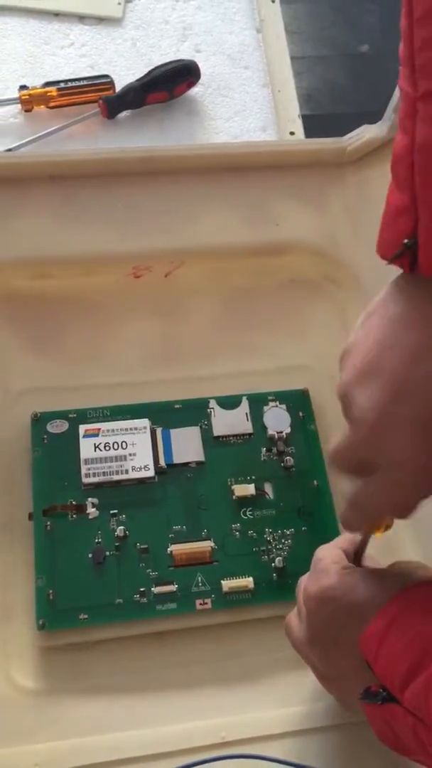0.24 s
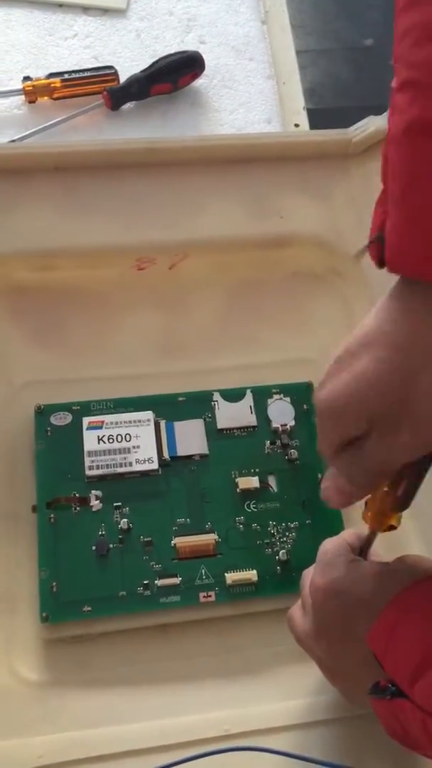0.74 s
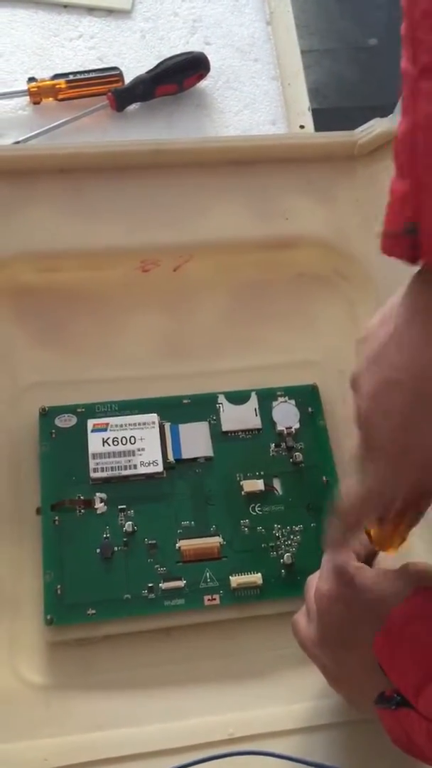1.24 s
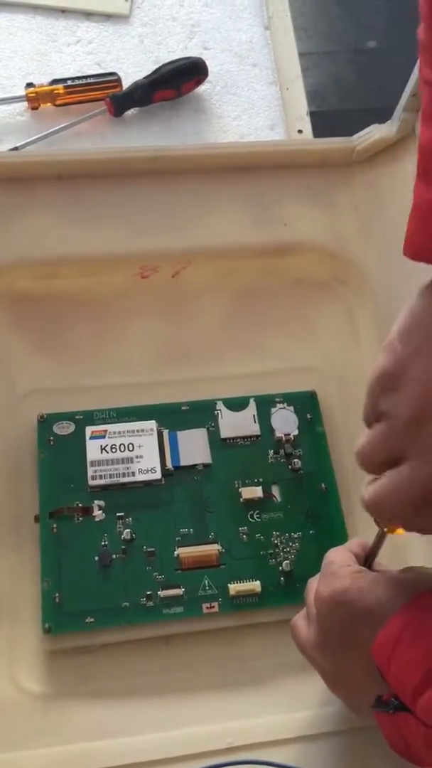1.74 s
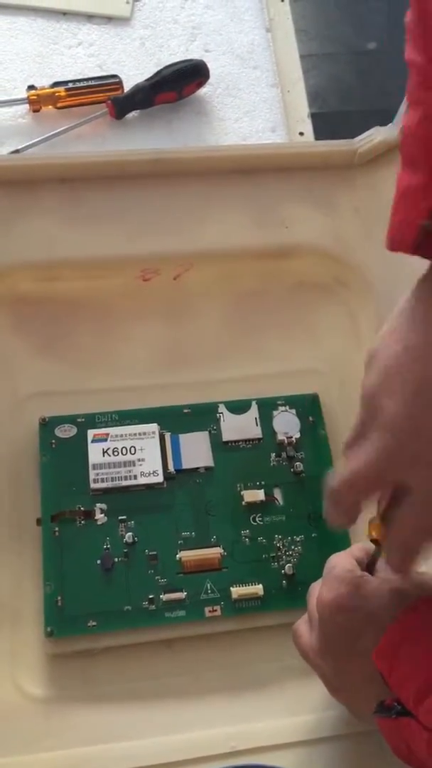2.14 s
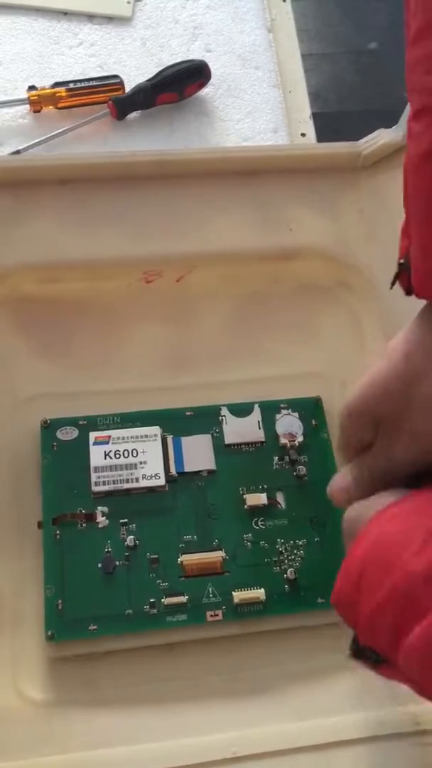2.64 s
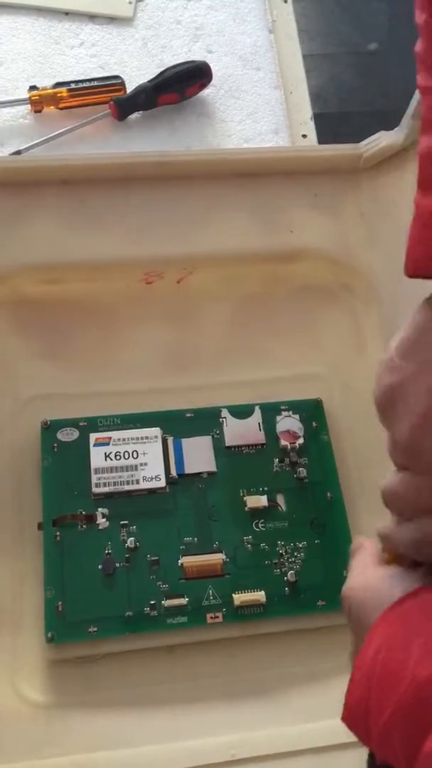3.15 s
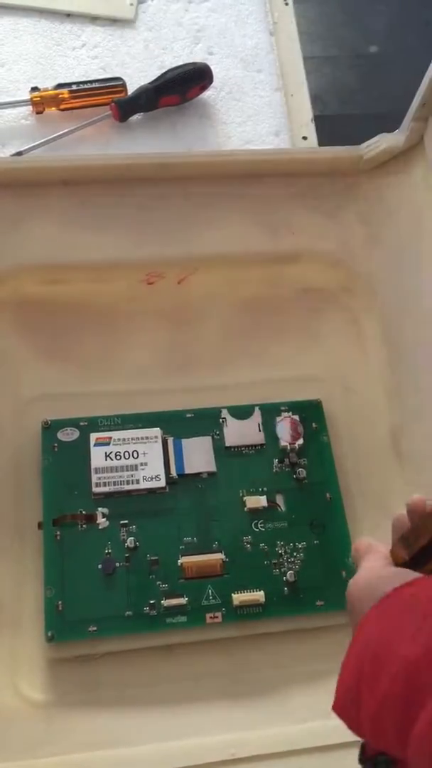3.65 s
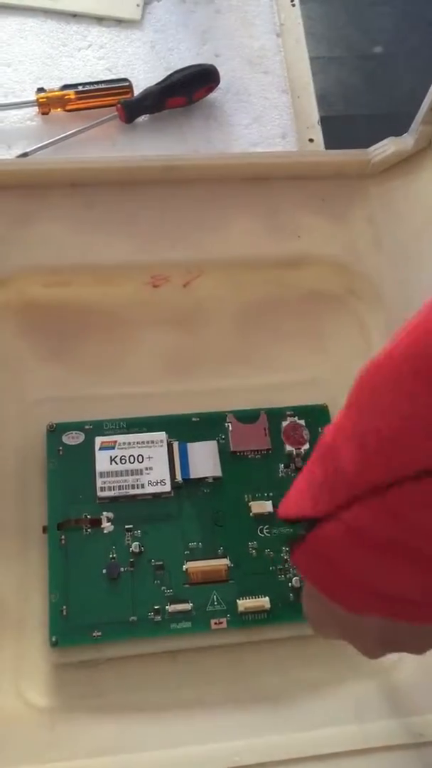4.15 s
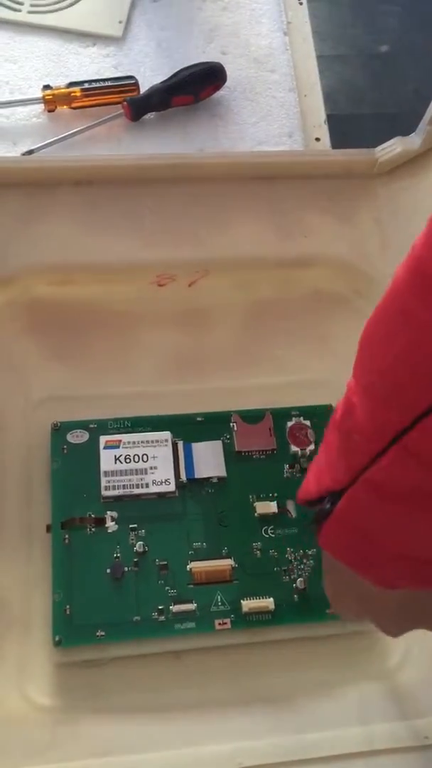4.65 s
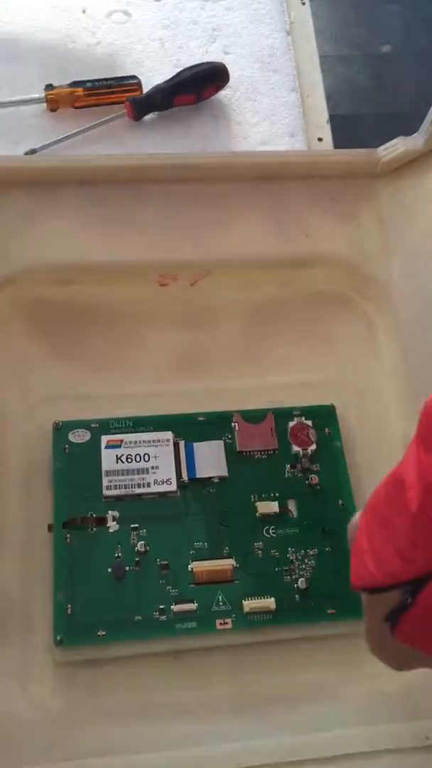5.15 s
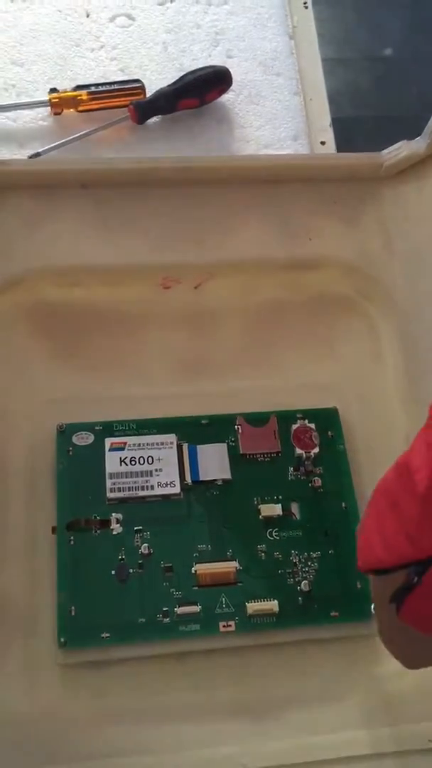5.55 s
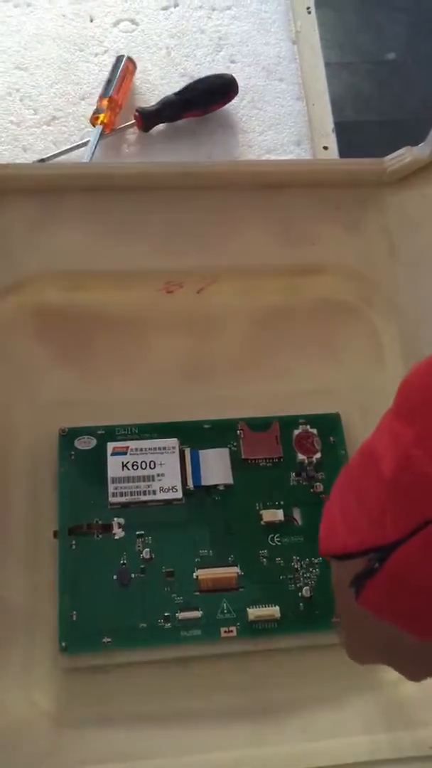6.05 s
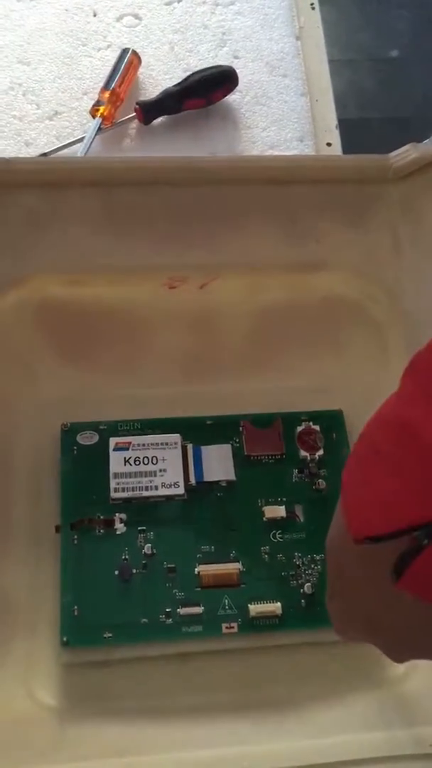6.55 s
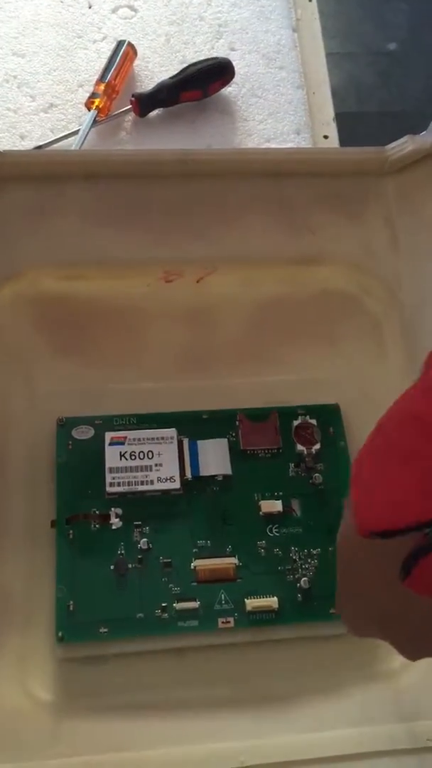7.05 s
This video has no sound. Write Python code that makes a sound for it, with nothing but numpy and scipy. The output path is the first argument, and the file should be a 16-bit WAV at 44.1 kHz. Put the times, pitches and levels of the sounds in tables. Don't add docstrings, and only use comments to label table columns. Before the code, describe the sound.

Handwork on a circuit board in a thin plastic tray: grainy skin rubbing, cloth rustle, sparse bright ticks and dull little thuds. A burst of sharp board knocks comes before the middle, then softer sweeping and light taps. Later a tool handle bounces on the table, the table is struck hard, metal shafts rattle together and another tool lifts with a clack. Small room, short echo, faint deep hum, close phone microphone.

```python
import sys
import numpy as np
from scipy import signal
from scipy.fft import rfft, irfft, next_fast_len
from scipy.io import wavfile
from scipy.ndimage import uniform_filter1d, map_coordinates

SR = 44100
rng = np.random.default_rng(int(sys.argv[2]) if len(sys.argv) > 2 else 0)


def how_loud(loudness_db):
    steps = np.asarray(loudness_db, float) / 20
    return 10 ** steps


def store_pcm(level_fs):
    pcm = np.round(np.clip(level_fs, -1, 1) * 32767).astype(np.int16)
    wavfile.write(sys.argv[1], SR, np.atleast_2d(pcm).T)


N = 321489

# frequency in Hz, level in dB per Hz.
SKIN_COLOUR = [(290, -30), (500, -3.5), (600, 0), (1250, 2.5), (2300, 3), (4410, -8), (10000, -25.5),
               (19800, -120)]
# frequency in Hz, level in dB per Hz.
SLEEVE_COLOUR = [(2350, -15), (4000, -2.5), (5190, -5), (5780, -2), (8030, -7), (9790, -6.5), (13200, -9),
                 (15500, -14.5)]
# start in seconds, fade in seconds, skin in dB, sleeve in dB.
GRIPS = [(0, 1, -55.5, -66.5), (0.071, 0.16, -49, -58), (1.053, 0.15, -41.5, -46.5),
         (1.837, 0.49, -52, -81), (2.48, 0.08, -40, -45.5), (2.536, 0.1, -35.5, -49),
         (4.179, 0.51, -51, -61), (5.276, 0.33, -52.5, -61.5), (5.455, 0.17, -39, -52),
         (5.704, 0.35, -43.5, -42), (7.087, 0.26, -47, -73)]
# peak, swell and fade in seconds, skin in dB, sleeve in dB.
TWISTS = [(0.35, 0.1, 0.17, -45.5, -55.5), (.48, 0.1, 0.064, -53.5, -92), (.83, 0.084, 0.016, -46.5, -59),
          (0.75, 0.18, 0.094, -46, -58), (0.893, 0.069, 0.045, -44, -65), (.99, 0.13, 0.14, -55, -76),
          (1.157, 0.051, 0.14, -43.5, -42.5), (1.544, 0.1, 0.061, -58, -60.5),
          (1.649, 0.11, 0.16, -60, -79), (1.993, 0.12, 0.099, -48.5, -61), (2.253, 0.019, 0.15, -45.5, -44)]
# peak, swell and fade in seconds, skin in dB, sleeve in dB.
SWEEPS = [(2.592, 0.11, 0.096, -35, -38), (2.77, 0.088, 0.72, -66, -63), (3.127, 0.045, 0.15, -49.5, -62.5),
          (3.606, 0.13, 0.11, -43, -35.5), (3.64, 0.048, 0.15, -45.5, -54),
          (3.824, 0.19, 0.17, -52.5, -56.5), (3.874, 0.13, 0.027, -71, -50),
          (4.256, 0.13, 0.41, -47, -46.5), (4.437, 0.45, 0.076, -51, -66), (4.643, 0.25, .1, -50, -51),
          (4.851, 0.074, 0.035, -49.5, -50.5), (4.926, 0.1, 0.16, -49, -47),
          (5.036, 0.11, 0.23, -52.5, -46.5), (5.44, 0.32, 0.15, -53, -56.5),
          (5.945, 0.038, 0.22, -39.5, -47), (6.099, 0.22, 0.11, -50, -46), (6.273, 0.37, 0.26, -52, -60.5),
          (6.418, 0.17, 0.27, -57.5, -57), (6.652, 0.053, 0.21, -63, -66), (7.056, 0.076, 0.35, -56.5, -62),
          (7.201, 0.19, 0.096, -40.5, -71.5), (7.29, 0.056, .1, -43, -65)]
# peak, swell and fade in seconds, tray drumming in dB, table rumble in dB.
PRESSES = [(0, .1, 0.18, -43.5, -70), (.432, 0.23, 0.076, -39.5, -60), (.642, 0.023, 0.17, -45.5, -58),
           (.791, 0.23, 0.14, -43.5, -56.5), (1.15, 0.18, 0.17, -42.5, -55),
           (1.434, 0.0088, 0.15, -39, -46.5), (1.839, 0.0058, 0.33, -45.5, -65),
           (2.048, 0.37, 0.068, -47, -59), (2.481, 0.013, 0.27, -34, -72), (2.592, 0.052, 0.33, -35, -47),
           (2.826, 0.88, 0.15, -46, -60), (3.165, 0.137, 0.25, -52.5, -70), (3.51, 0.09, 0.059, -48, -63),
           (3.684, 0.081, 0.17, -43.5, -48), (4.179, 0.0032, 0.56, -57, -57.5),
           (4.812, 0.014, 0.18, -51, -46.5), (4.68, 0.11, 0.14, -74, -51), (4.926, 0.089, 0.19, -51, -63),
           (5.06, 0.076, 0.17, -67, -60), (5.457, 0.0059, 0.3, -61, -38), (5.704, 0.0031, 0.25, -67, -33),
           (6.009, 0.078, 0.18, -31, -32), (6.33, 0.28, 0.22, -73, -53), (7.087, 0.068, 0.7, -39, -55.5)]
# skin, sleeve, tray and table, all in dB.
REST_DB = [-81, -75.5, -72, -71]

# start in seconds, peak in dB, dull part in dB beside the peak.
TICKS = [(.0741, -54, 15), (.3446, -35, -5.5), (.6035, -49, -22), (1.0535, -51, 11), (1.0695, -32.5, -12),
         (1.147, -59, -11), (1.4356, -30.5, -22), (1.4673, -58.5, 16.5), (1.836, -36, -32),
         (1.8652, -39.5, -25), (1.9054, -50, 5), (2.0096, -41.5, 9.5), (2.1375, -41, -11), (2.2467, -45, 5),
         (2.3901, -35, -5.5), (2.4798, -36, -13), (2.5107, -43.5, -13.5), (2.537, -49, 6),
         (2.6705, -35.5, 15.5), (3.8484, -30.5, -6), (4.1208, -40, 0.5), (4.1764, -40.5, 0),
         (4.5215, -33, -8.5)]
# start in seconds, peak in dB, dull part in dB beside the peak.
JOSTLES = [(5.4586, -46.5, 13.5), (5.7034, -21.5, -9.5), (5.7234, -30.5, -8), (5.7565, -32, -4),
           (5.7933, -25.5, -15), (5.8064, -26, -14), (5.8726, -33.5, -10), (5.886, -44.5, 4),
           (5.906, -41.5, 3), (5.923, -40, -8), (5.9352, -37, -4), (5.9884, -37, -6), (6.0305, -26, -8),
           (6.036, -20, -15), (6.656, -52, 1.5), (7.0853, -23.5, -19), (7.277, -45, 1)]
# start in seconds, peak in dB, dull part in dB beside the peak.
SCUFFS = [(.2, -51.5, 8.5), (0.475, -51, 0), (.7454, -53, 11), (.815, -44, -4.5), (.095, -47.5, 9),
          (.8854, -49.5, 4), (1.153, -41.5, 12.5), (1.506, -58, 7), (2.567, -35.5, 8), (2.762, -37, 6),
          (2.908, -48.5, -5.5), (4.849, -36, 1.5), (4.998, -30, -2.5), (5.023, -42, 9.5),
          (5.392, -52.5, 14), (7.1586, -51, 12), (7.173, -55, 6), (7.197, -60, 1), (7.224, -57, 8)]

# start in seconds, peak in dB, share of the high tones in dB.
THUDS = [(0.074, -47, -6), (0.346, -47.5, 5.5), (0.393, -34.5, -7), (.212, -56, 6.5), (.44, -54, -6),
         (.612, -60, 7.5), (0.648, -44, -4.5), (1.041, -43, -11), (1.162, -46, 4.5), (1.432, -38.5, -0.5),
         (1.464, -50, 6), (1.755, -36.5, -14), (1.843, -40.5, -0.5), (1.927, -48, 5), (2.025, -54.5, 8),
         (2.143, -50, 0.5), (2.317, -52, 11), (2.394, -50, 12), (2.482, -45, -23), (2.531, -29, -17),
         (2.675, -23.5, -17), (2.77, -23, -11), (3.137, -49.5, 4), (3.504, -57, -14), (3.656, -53, 2),
         (4.905, -56, 12.5), (7.089, -40, 10.5)]
# frequency in Hz, level in dB, time to die by 60 dB in seconds.
TRAY_LOW_TONES = [(257.3, 10.5, 0.056), (308, -7.5, 0.039)]
# frequency in Hz, level in dB, time to die by 60 dB in seconds.
TRAY_HIGH_TONES = [(551.6, 10.5, 0.055), (678, -11, 0.14)]
# frequency in Hz, level in dB, time to die by 60 dB in seconds.
RIM_TONES = [(330, 0, 0.42)]
# start in seconds, peak in dB.
BOARD_KNOCKS = [
    (2.531, -24.5),
    (2.548, -27),
    (2.565, -27.5),
    (2.65, -31),
    (2.6703, -10),
    (2.769, -14),
]
# frequency in Hz, level in dB, time to die by 60 dB in seconds.
BOARD_TONES = [(545, -11, .14), (680, -6, .09), (800, -9, .07), (995, -3, .06), (1130, -4, .06),
               (1260, -4, .055), (1420, -2, .045), (1600, -5, .04), (1750, -6, .055), (1925, -4, .04),
               (2220, -8, .055), (2500, -9, .04), (2800, -9, .045), (3400, -17, .04)]
# start in seconds, peak in dB.
EDGE_TAPS = [
    (.391, -33),
    (1.467, -40),
    (1.751, -30),
    (3.984, -51.5),
    (4.432, -33.5),
    (4.524, -29.5),
    (4.632, -38.5),
    (6.657, -45),
]
# frequency in Hz, level in dB, time to die by 60 dB in seconds.
EDGE_TONES = [(1001, -1, 0.065), (1192, -2.5, 0.075), (2060, -9.5, 0.032), (2790, -16.5, 0.044)]
# start in seconds, peak in dB.
TABLE_BUMPS = [
    (3.661, -37.5),
    (3.692, -38),
    (4.264, -44),
    (4.815, -41),
    (5.458, -33.5),
    (5.7062, -18.5),
    (5.9445, -17.5),
    (5.9895, -19),
    (6.002, -27),
    (6.05, -27.5),
]
# frequency in Hz, level in dB, time to die by 60 dB in seconds.
TABLE_TONES = [(118, -12, 0.15), (148, 4, 0.045), (205, -1, 0.04), (270, -1, 0.04), (335, -9, 0.05),
               (650, -20, 0.03), (725, -18, 0.035)]
# start in seconds, peak in dB.
TABLE_RAPS = [
    (5.9885, -27.5),
    (6.003, -28.5),
    (6.012, -36),
    (6.022, -30),
    (6.085, -36),
]
# frequency in Hz, level in dB, time to die by 60 dB in seconds.
LEDGE_TONES = [(327, 2, 0.052), (428, -9, 0.056), (537, -7, 0.034)]
# start in seconds, peak in dB.
HANDLE_DROPS = [
    (5.456, -30),
    (5.467, -30.5),
    (5.487, -32),
    (5.516, -38),
    (5.535, -36.5),
    (5.564, -39.5),
    (5.582, -48),
    (5.598, -47),
]
# frequency in Hz, level in dB, time to die by 60 dB in seconds.
HANDLE_TONES = [(1007, -10, 0.1), (1187, 3, 0.14), (1258, 2.5, 0.16), (1404, -15, .08), (2090, -22, .07),
                (2780, -8, 0.074), (3110, -2, 0.14), (3580, -18, 0.086)]
# start in seconds, peak in dB.
SHAFT_CLINKS = [
    (6.0305, -15.5),
    (6.036, -9),
    (6.058, -33),
    (6.066, -27.5),
    (6.075, -30),
    (6.082, -31.5),
    (6.0955, -27.5),
    (6.101, -28.5),
    (6.107, -25),
]
# frequency in Hz, level in dB, time to die by 60 dB in seconds.
SHAFT_TONES = [(1933, -10, .04), (3440, -8, 0.07), (4600, -15, 0.04), (5060, -6, 0.045), (5380, -7, 0.035),
               (5700, -7, .035), (6300, -14, .035), (7930, 0, 0.026), (8100, -1, 0.026), (8450, -3, .02),
               (9650, -13, .025), (11500, -6, 0.025), (12700, -14, 0.022)]
# start in seconds, peak in dB.
TOOL_PICKUP = [
    (7.0863, -16),
    (7.0934, -22.5),
]
# frequency in Hz, level in dB, time to die by 60 dB in seconds.
TOOL_TONES = [(572, -7, 0.051), (820, -4, 0.1), (1120, -19, 0.097), (1483, 2.5, 0.097), (1770, 8, 0.033),
              (2290, -10, 0.091), (3280, -10, .06), (3530, 9, 0.051), (5050, -1, 0.039), (6020, -5, .03)]

# start and end in
# seconds, start, end and width in Hz, level in dB.
SLIDES = [(3.562, 3.622, 3450, 4050, 216, -39.5), (3.61, 3.652, 4300, 4950, 225, -42.5),
          (3.588, 3.618, 2000, 2050, 180, -43), (3.615, 3.655, 1950, 1850, 164, -41),
          (3.58, 3.62, 6500, 5500, 500, -57), (4.41, 3.8, 900, 1000, 315, -49),
          (6, 2.6, 1100, 1250, 630, -55), (6.199, 6.396, 800, 950, 390, -55.5),
          (7.1, 7.24, 600, 780, 350, -42), (6.3, 7.29, 1900, 1850, 300, -48),
          (1.05, 1.135, 2000, 2150, 300, -54), (1.14, 1.264, 1300, 2700, 270, -53),
          (1.5, 1.59, 1100, 920, 310, -64.5), (2.77, 2.93, 12000, 12500, 1000, -67),
          (2.8, 2.93, 14200, 14200, 900, -64), (4.44, 4.1, 1100, 1200, 350, -50.5),
          (7.04, 7.075, 2000, 1700, 500, -50), (2, 4.3, 2800, 1800, 330, -54),
          (4.3, 3.1, 3100, 6000, 900, -53.5)]
# start and end in seconds, start, end and width in Hz, level in
# dB.
SQUEAKS = [
    (2.16, 2.245, 2150, 2100, 170, -62),
    (1.51, 1.56, 2250, 2300, 250, -57),
    (6.64, 6.675, 2400, 2300, 800, -56),
]
# start and end in seconds, start, end and width in Hz, level in dB.
SWAYS = [
    (.12, .3, 50, 49.7, 30, -57),
    (4.25, 4.4, 60, 55.7, 30, -55),
    (4.626, 4.78, 70, 70.5, 35, -57),
    (4.779, 4.96, 60, 60, 35, -48),
    (7.059, 7.24, 70, 70, 35, -63),
    (4.999, 5.162, 64.5, 59.6, 30, -47),
    (5.541, 5.68, 90, 84.5, 40, -43.5),
    (6.22, 6.42, 75, 69.5, 35, -49.5),
    (6.379, 6.518, 79.7, 74.6, 35, -55.5),
]
# frequency in Hz, time to die by 60 dB in seconds.
ROOM_ECHO = [(150, 0.76), (1000, 0.48), (4000, 0.27), (12000, 0.3)]
# frequency in Hz, level in dB per Hz.
AIR_COLOUR = [(15, -37), (35, 9.5), (123, -0.5), (447, -17), (700, -15.5), (1870, -23.5), (4930, -29.5),
              (15700, -30.5)]


def unit(x):
    return x / np.sqrt(np.mean(x ** 2) + 1e-20)


def along(points, hz):
    point_hz, value = np.transpose(points)
    return np.interp(np.log(hz + 1), np.log(point_hz + 1), value)


def wobble(rate, size=N):
    knots = rng.standard_normal(int(size * 900 / SR) + 4)
    return map_coordinates(knots, [np.arange(size) * min(rate, 900) / SR])


def filtered(x, response):
    size = next_fast_len(N + SR // 2)
    spectrum = rfft(x, size) * response(np.fft.rfftfreq(size, 1 / SR))
    return irfft(spectrum, size)[:N]


def peak(centre_hz, width_hz):
    return lambda f: 1j * f * width_hz / (centre_hz ** 2 - f * f + 1j * f * width_hz)


def rubbing(response, grain_db, lump_db, patchy_db=0.):
    slip = how_loud(grain_db * wobble(700) + lump_db * wobble(45))
    spectra = signal.stft(slip * rng.standard_normal(N), nperseg=512)[2]
    patches = uniform_filter1d(rng.standard_normal(spectra.shape), size=5, axis=0)
    patches = unit(uniform_filter1d(patches, size=7, axis=1))
    noise = signal.istft(spectra * how_loud(patchy_db * patches), nperseg=512)[1][:N]
    return unit(filtered(noise, response))


def strokes(rows, quicker, rest_db):
    peak_s, swell_s, fade_s, *peaks_db = np.transpose(rows)[:, :, None]
    t = np.arange(0, N / SR, .001)
    under_db = 20 * np.maximum((peak_s - t) / swell_s, (t - peak_s) / fade_s)
    gains = []
    for db, speed, low_db in zip(peaks_db, (1, quicker), rest_db):
        power = (how_loud(db - speed * under_db) ** 2).sum(axis=0) + how_loud(low_db) ** 2
        gains.append(np.interp(np.arange(N) / SR, t, np.sqrt(power)))
    return gains


def contacts(events, rise, t60):
    bright, dull = np.zeros(N + SR), np.zeros(N + SR)
    t = np.arange(SR // 4) / SR
    shape = how_loud(-60 * t / t60) * (1 - np.exp(-t / rise))
    for s, db, dull_db in events:
        start = round(s * SR)
        bright[start:][:len(t)] += how_loud(db) * shape
        dull[start:][:len(t)] += how_loud(db + dull_db) * shape
    return np.array([bright[:N], dull[:N]])


def struck(events, tones, blur=.01, crack=0., attack=0.0011):
    hz, db, t60 = np.transpose(tones)[:, :, None]
    out = np.zeros(N + SR)
    t = np.arange(SR // 3 if t60.max() > .15 else SR // 7) / SR
    for s, level_db in events:
        luck_db, luck_pitch = rng.standard_normal((2, len(tones), 1))
        steps = uniform_filter1d(rng.standard_normal((len(tones), len(t))), size=24)
        drift = np.cumsum(steps, axis=1) * np.sqrt(2 * np.pi * blur * hz / SR)
        phase = 2 * np.pi * hz * (1 + 0.004 * luck_pitch) * t + drift
        ring = (how_loud(db + 2 * luck_db - 60 * t / t60) * np.sin(phase)).sum(axis=0)
        ring *= (1 - np.exp(-t / attack)) * (1 - t / t[-1])
        snap = crack * how_loud(-60 * t / 0.0081) * uniform_filter1d(rng.standard_normal(len(t)), size=6)
        out[round(s * SR):][:len(t)] += how_loud(level_db) * (ring / np.abs(ring).max() + snap)
    return out[:N]


def hands():
    grips = [(s, .004, *rest) for s, *rest in GRIPS]
    on_skin, on_sleeve = strokes(grips + TWISTS + SWEEPS, quicker=1.51, rest_db=REST_DB[:2])
    on_tray, on_table = strokes(PRESSES, quicker=0.91, rest_db=REST_DB[2:])
    skin = rubbing(lambda f: how_loud(along(SKIN_COLOUR, f)), grain_db=2.3, lump_db=2.0, patchy_db=2.5)
    sleeve = rubbing(lambda f: how_loud(along(SLEEVE_COLOUR, f)), grain_db=2, lump_db=1.2, patchy_db=2.2)
    tray = rubbing(lambda f: peak(260, 90)(f) + 0.21 * peak(330, 50)(f) - 0.42 * peak(545, 120)(f),
                   grain_db=1.0, lump_db=3.0)
    table = rubbing(lambda f: peak(95, 90)(f) * peak(135, 90)(f), grain_db=0.5, lump_db=1.5)
    return on_skin * skin + on_sleeve * sleeve + how_loud(-6.0) * on_tray * tray + on_table * table


def ticks():
    scuffs = [(s - .004, *rest) for s, *rest in SCUFFS]
    touches = contacts(TICKS, rise=0.0027, t60=0.025)
    touches += contacts(JOSTLES, rise=0.00067, t60=0.022)
    touches += how_loud(1.5) * contacts(scuffs, rise=0.015, t60=0.067)
    bright, dull = touches
    high = rubbing(lambda f: peak(12500, 9000)(f) * peak(9000, 9000)(f), grain_db=-2.0, lump_db=0.0)
    mid = rubbing(lambda f: peak(2200, 1500)(f) - 0.72 * peak(4200, 2000)(f), grain_db=0.0, lump_db=0.6)
    return how_loud(-2.5) * bright * high + how_loud(2.5) * dull * mid


def tray_thuds():
    low = struck([(s, db - 0.5) for s, db, _ in THUDS], TRAY_LOW_TONES, blur=0.039, attack=0.0021)
    high = struck([(s, db + high_db) for s, db, high_db in THUDS], TRAY_HIGH_TONES, blur=0.03, attack=0.0076)
    rim = struck(BOARD_KNOCKS, RIM_TONES, blur=0.0075, attack=0.0023)
    return low + high + how_loud(-21.5) * rim


def board_knocks():
    board = struck(BOARD_KNOCKS, BOARD_TONES, blur=0.037, crack=0.65, attack=0.00033)
    return how_loud(-1.0) * board + how_loud(-4.5) * struck(EDGE_TAPS, EDGE_TONES, blur=0.14)


def table_blows():
    top = struck(TABLE_BUMPS, TABLE_TONES, blur=0.0029, attack=0.0036)
    return top + struck(TABLE_RAPS, LEDGE_TONES, blur=0.023)


def tools():
    handle = struck(HANDLE_DROPS, HANDLE_TONES, blur=0.021, crack=0.3)
    shafts = struck(SHAFT_CLINKS, SHAFT_TONES, blur=0.029, crack=0.26, attack=0.00026)
    second_tool = struck(TOOL_PICKUP, TOOL_TONES, blur=0.04, crack=0.41)
    return handle + how_loud(-1.5) * (shafts + second_tool)


def slides_and_sways():
    out = np.zeros(N + SR)
    t = np.linspace(0, 1, num=SR // 5) * (SR // 5) / SR
    for start, end, from_hz, to_hz, width_hz, db in SLIDES + SQUEAKS + SWAYS:
        wander_cos, wander_sin = wobble(width_hz, size=len(t)), wobble(width_hz, size=len(t))
        part = np.clip(t / (end - start), 0, 1)
        phase = 2 * np.pi * np.cumsum(from_hz + (to_hz - from_hz) * part) / SR
        swell = 4 * part * (1 - part)
        whistle = wander_cos * np.cos(phase) + wander_sin * np.sin(phase)
        out[round(start * SR):][:len(t)] += how_loud(db) * swell * whistle
    return out[:N]


def room(x):
    hz, t, spectra = signal.stft(rng.standard_normal(SR // 2), SR, nperseg=256)
    fade = how_loud(-60 * t / along(ROOM_ECHO, hz)[:, None])
    tail = signal.istft(spectra * fade, SR, nperseg=256)[1]
    late = np.pad(x, (200, 0))
    return signal.fftconvolve(late, tail / np.linalg.norm(tail))[:N]


def workshop_air():
    hum = unit(filtered(rng.standard_normal(N), lambda f: how_loud(along(AIR_COLOUR, f))))
    return how_loud(-64 + 0.55 * wobble(6.5)) * hum


def scene():
    hits = ticks() + tray_thuds() + board_knocks() + table_blows() + tools()
    mix = hands() + hits + slides_and_sways() + how_loud(-12.0) * room(hits) + workshop_air()
    return mix[None]


def roll_off(x):
    return signal.sosfilt(signal.butter(12, 16800, fs=SR, output="sos"), x)


def record(dry):
    def microphone(f):
        bass_cut = (1j * f / (40 + 1j * f)) ** 3
        dips = (1 - 0.39 * peak(10500, 900)(f)) * (1 - 0.074 * peak(7500, 700)(f))
        top_edge = np.where(f < 15900, 1 + .2 * (f / 15900) ** 10, .04 * (f < 16800))
        return bass_cut * dips * top_edge
    mix = filtered(dry[0], microphone)[None]
    return roll_off(mix)


dry = scene()
out = record(dry)
store_pcm(out)
```